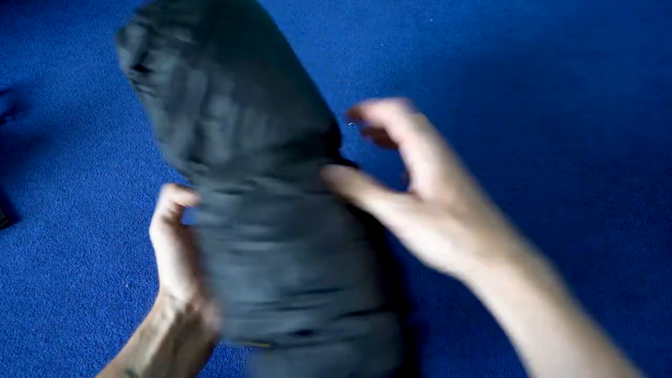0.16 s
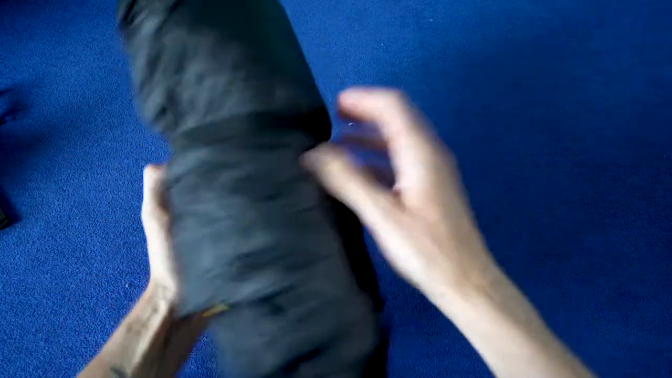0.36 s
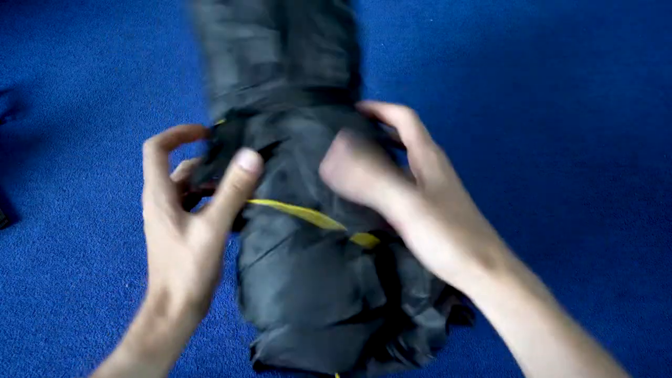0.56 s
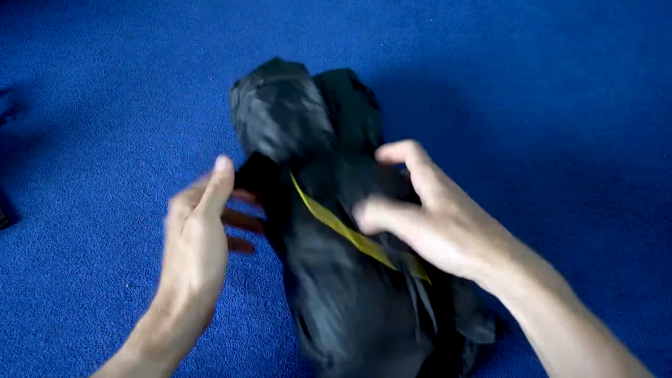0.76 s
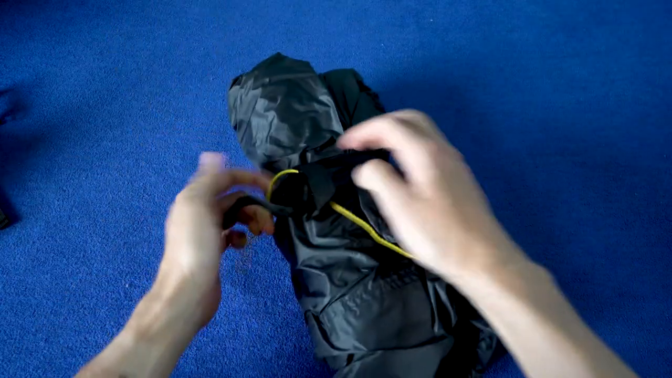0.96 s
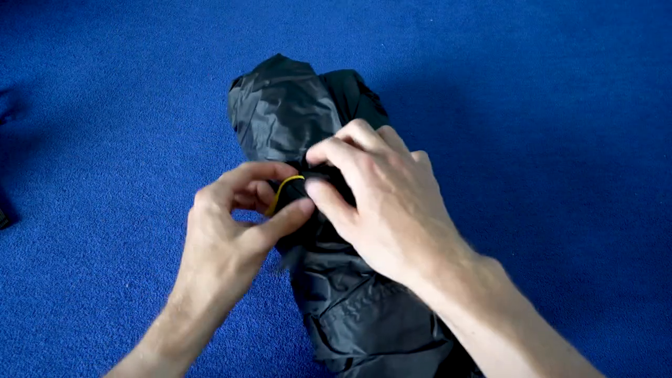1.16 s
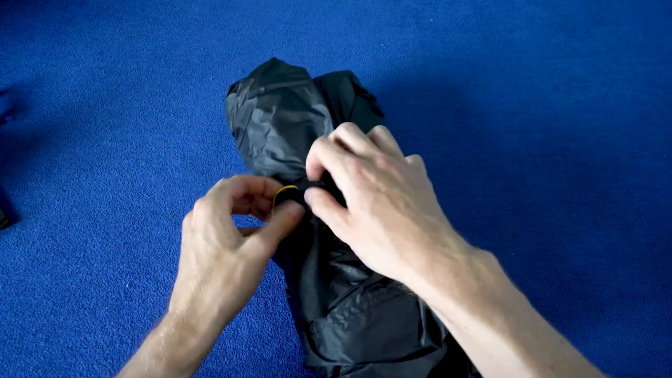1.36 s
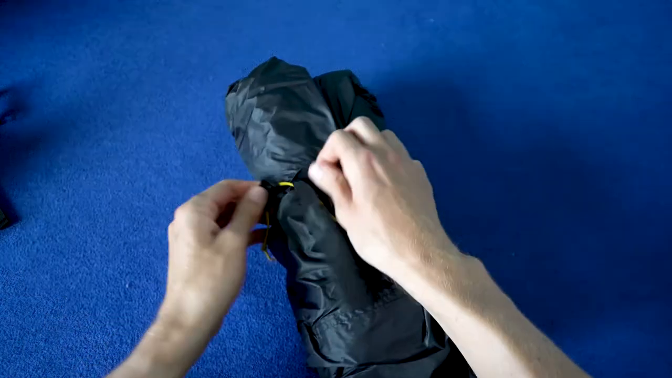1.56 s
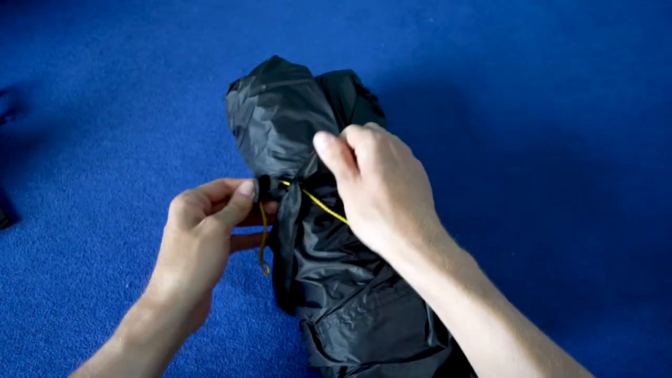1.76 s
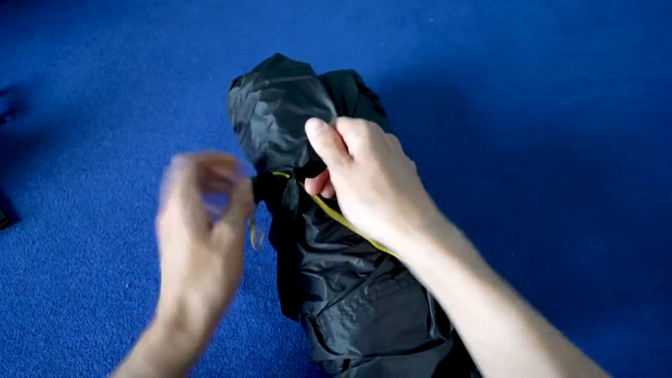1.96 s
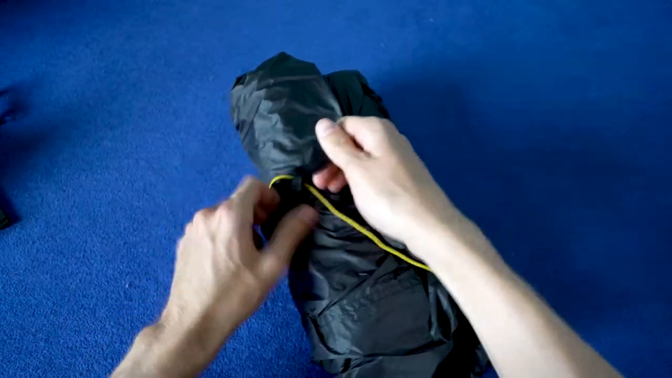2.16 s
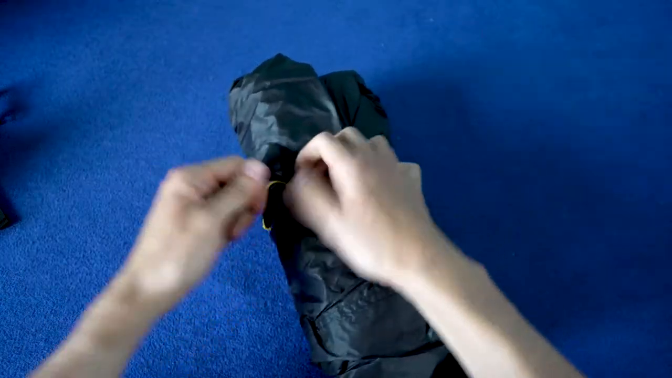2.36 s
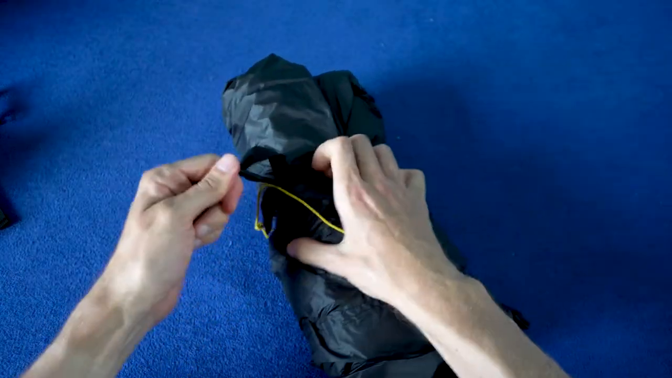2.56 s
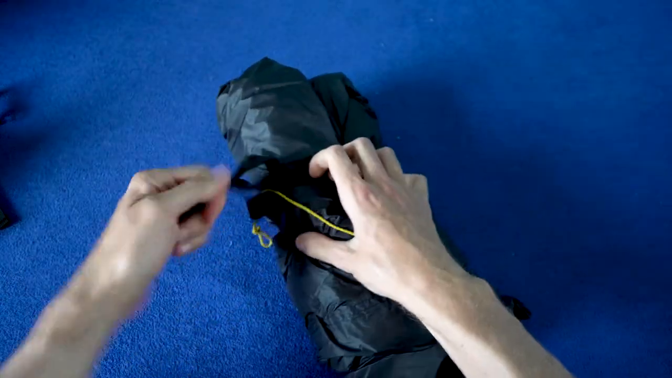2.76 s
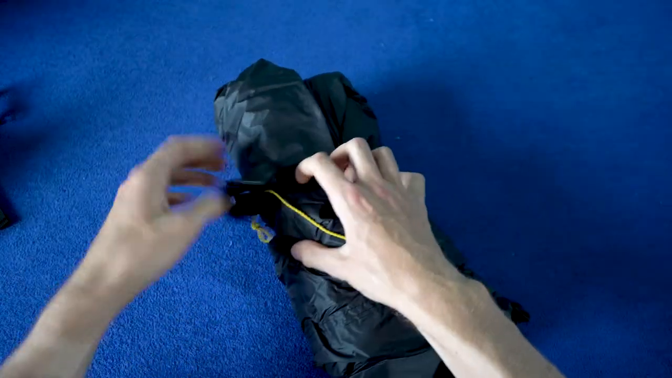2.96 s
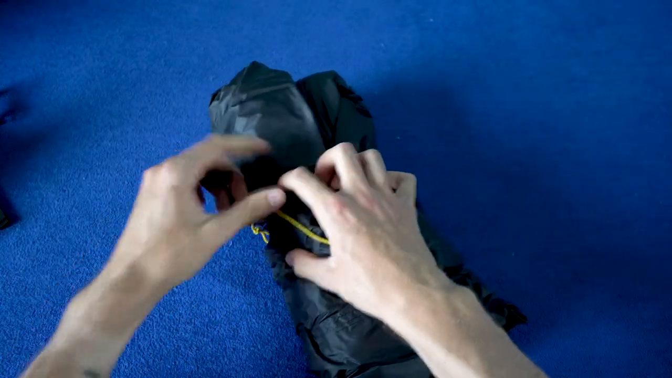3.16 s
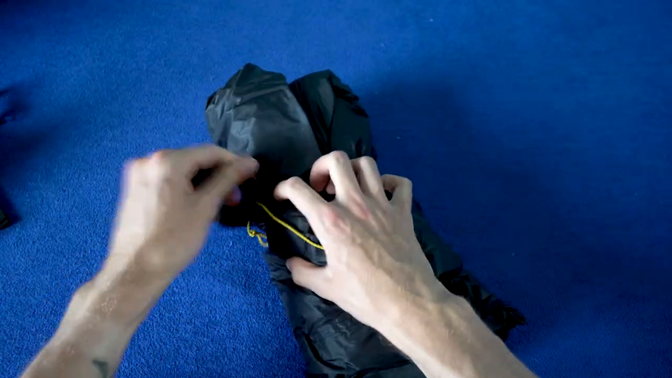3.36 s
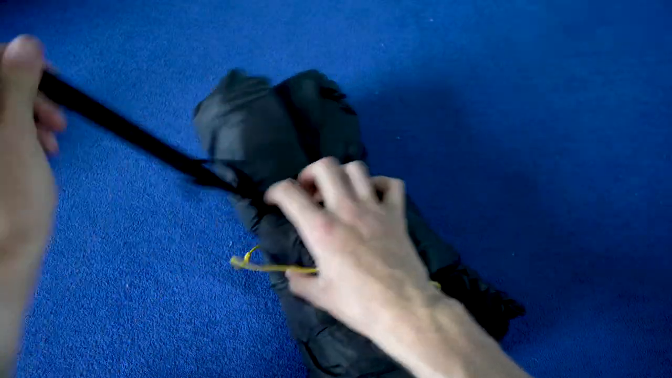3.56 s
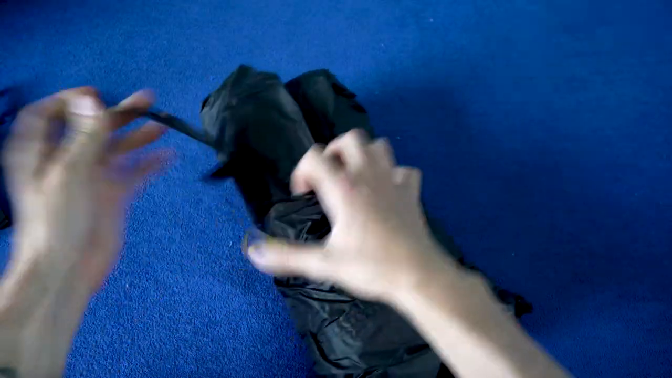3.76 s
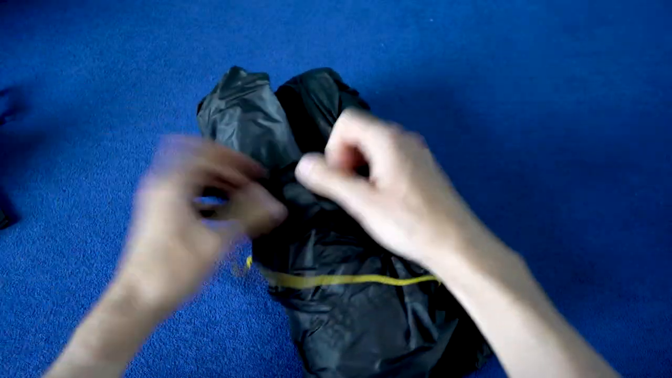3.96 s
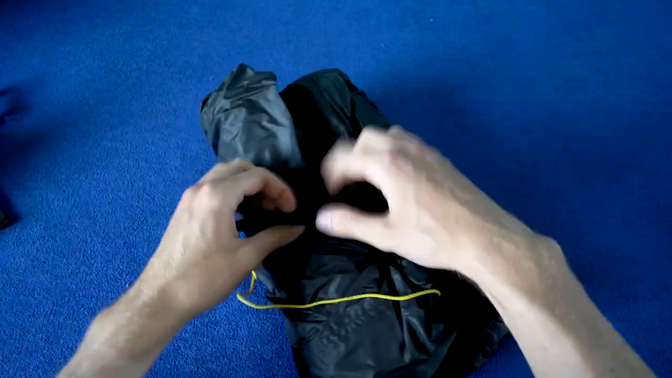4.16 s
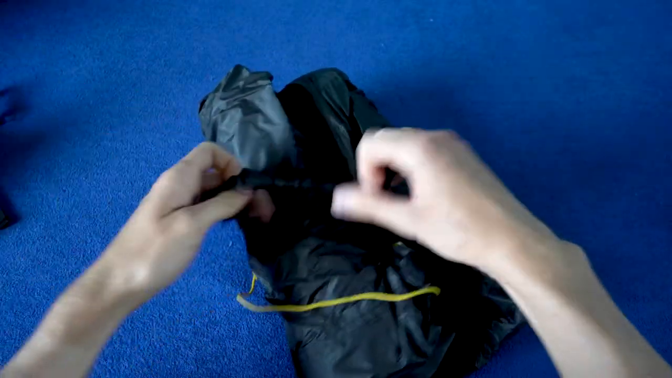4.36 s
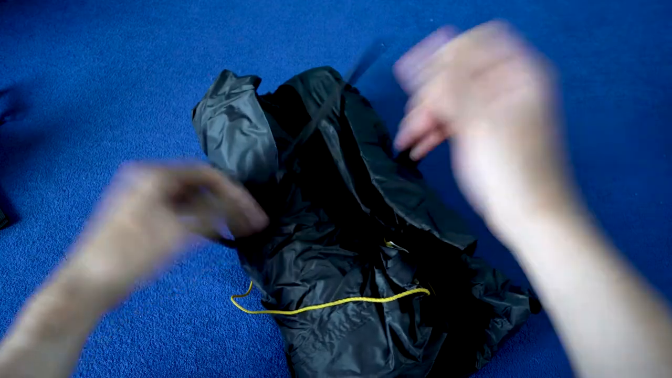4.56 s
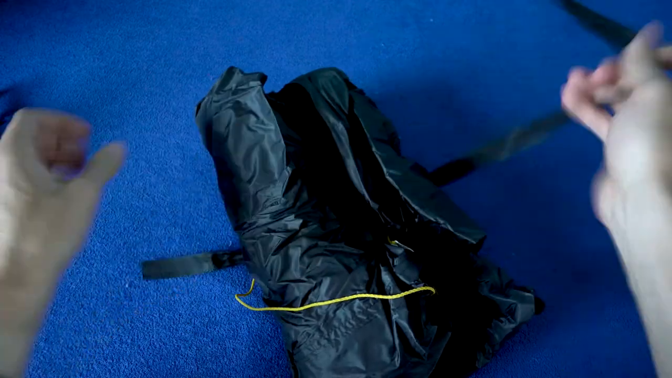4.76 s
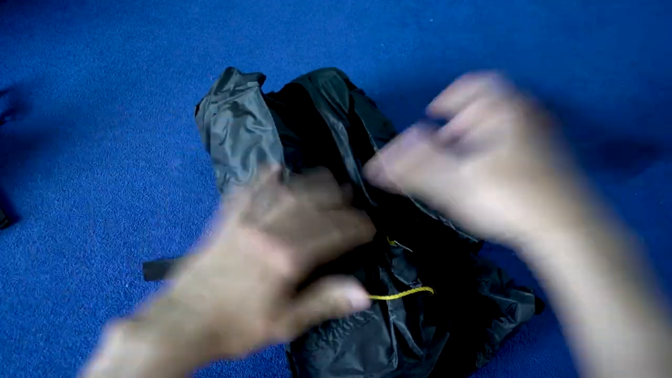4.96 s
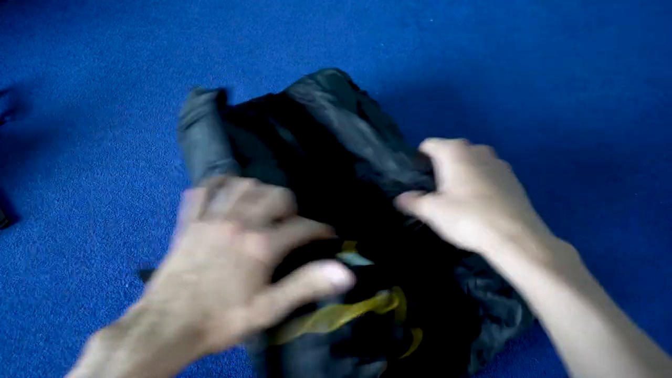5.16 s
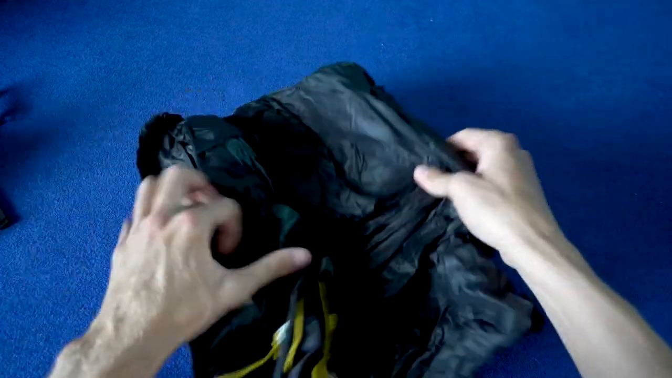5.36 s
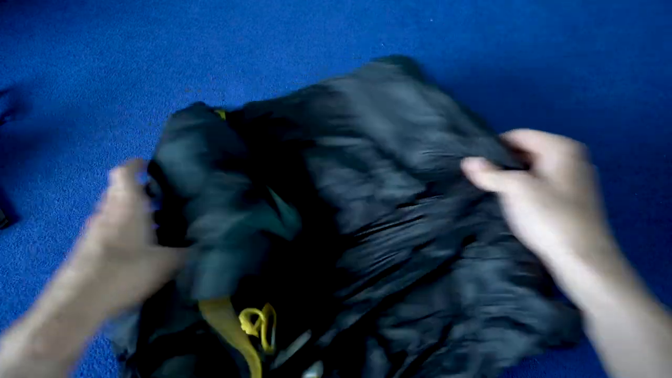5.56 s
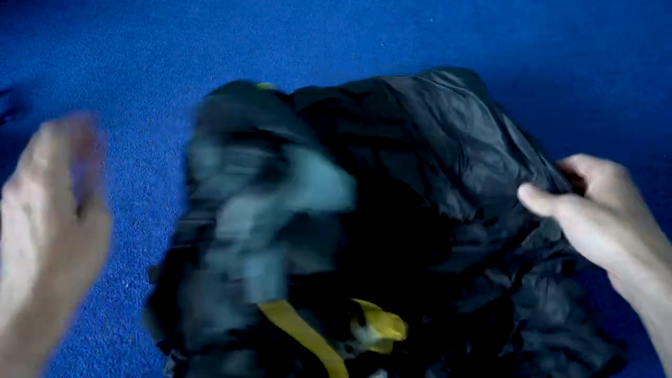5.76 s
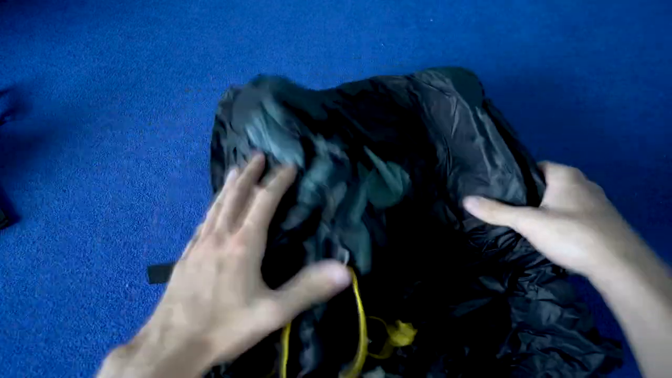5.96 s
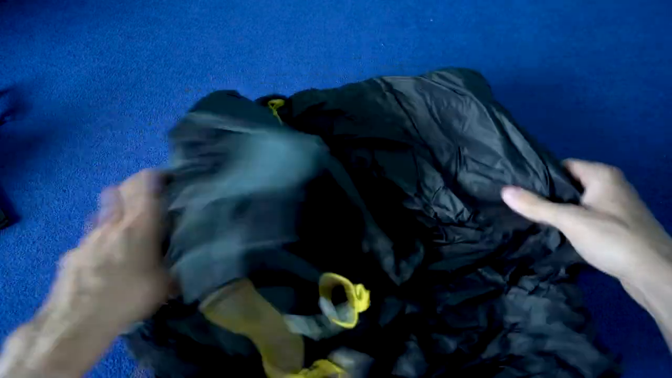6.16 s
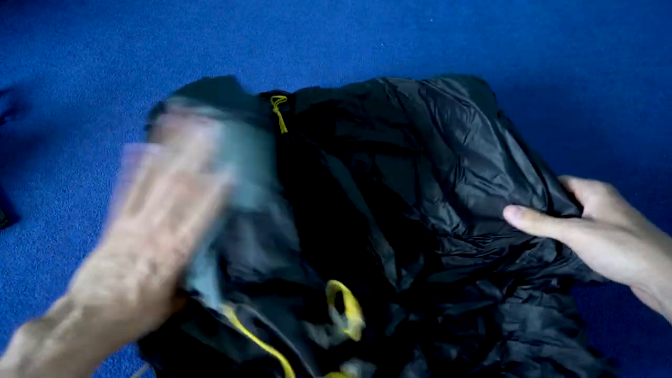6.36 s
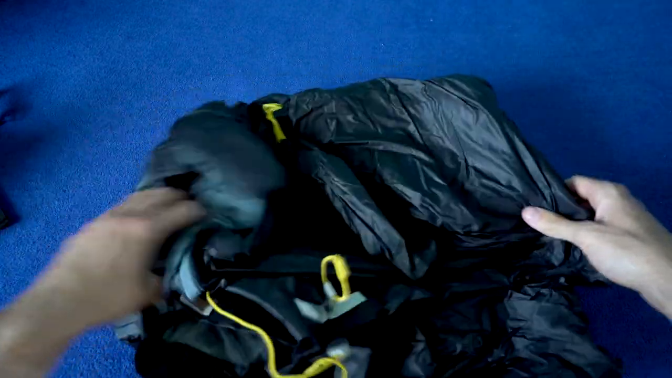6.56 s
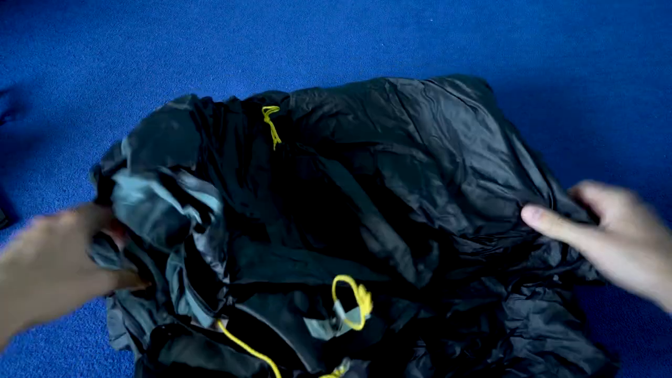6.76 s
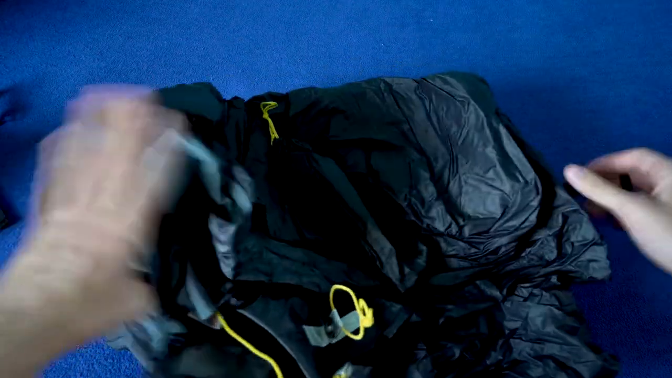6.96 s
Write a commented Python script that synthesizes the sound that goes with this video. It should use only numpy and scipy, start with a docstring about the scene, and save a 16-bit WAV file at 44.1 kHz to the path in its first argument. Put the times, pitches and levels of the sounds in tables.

```python
"""A bundle of thin nylon tent cloth is turned, untied and unrolled on a carpet, close to a stereo microphone.
The cloth is banded noise for the sliding hiss plus clumped clicks, snaps and ticks for buckling creases. A
strap whips out of its knot as gliding narrow-band noise; rubs are noise swells through one resonance. The
bundle thuds in damped low modes, the strap's pops set floor and room ringing, and small metal parts clink in
high ones. Shaped noise makes the faint room tone below; peaks and notches colour the whole."""
import sys
import numpy as np
from scipy import signal
from scipy.io import wavfile

SR = 44100
rng = np.random.default_rng(int(sys.argv[2]) if len(sys.argv) > 2 else 0)


def transcribe(u):
    """Save the signal u as a 16-bit wav file named by the first command-line argument.

    u: samples, shape (n,) or (channels, n), limited to [-1, 1]; the rate is SR.
    q: integer samples, one column per channel.
    """
    v = np.clip(np.atleast_2d(u).T, -1, 1)
    q = np.round(v * 32767).astype(np.int16)
    wavfile.write(sys.argv[1], SR, q)


N = 308700   # samples, 7 s


def from_db(db):
    """Gain of a level in dB."""
    return 10 ** (np.asarray(db) / 20)


def rms_one(x):
    """Scale to rms 1."""
    return x / np.sqrt(np.mean(x ** 2) + 1e-20)


def in_time(rows):
    """Columns of a curve table, one value per sample."""
    s, *columns = np.transpose(rows)
    return [np.interp(np.arange(N) / SR, s, c) for c in columns]


def at_hz(points, hz):
    """Read a spectrum on a log-frequency axis."""
    point_hz, value = np.transpose(points)
    return np.interp(np.log(hz), np.log(point_hz), value)


def drift(rate_hz):
    """Slow chance: coarse noise through a double one-pole low-pass; spread 1."""
    step = 40   # samples per coarse value
    r = np.exp(-2 * np.pi * rate_hz * step / SR)
    coarse = rng.standard_normal(N // step + 2002)
    slow = signal.lfilter([1], [1, -2 * r, r * r], coarse)[2000:]   # drop the filter's start
    return np.interp(np.arange(N) / step, np.arange(len(slow)), rms_one(slow))


def slips(per_s, fade_s, depth):
    """Folds let go suddenly and settle slowly: a power envelope of mean 1."""
    kicks = (rng.random(N) < per_s / SR) * rng.exponential(1, N)
    power = 1 + depth * signal.lfilter([1], [1, -np.exp(-1 / (fade_s * SR))], kicks)
    return power / power.mean()


def ring(clicks, hz, t60_s):
    """Clicks excite a two-pole resonance: each one sets off a decaying sine."""
    r, w = from_db(-60 / (t60_s * SR)), 2 * np.pi * hz / SR
    return signal.lfilter([0, np.sin(w)], [1, -2 * r * np.cos(w), r * r], clicks + 1e-18)


def panned(x, left_db):
    """Place a sound between the two microphones by level."""
    return np.array([x * from_db(left_db / 2), x * from_db(-left_db / 2)])


def apart(click, lag_s):
    """The right microphone hears a click a little earlier or later."""
    i = np.arange(click.shape[1])
    return np.array([click[0], np.interp(i - lag_s * SR, i, click[1])])


def add(out, s, sound):
    """Mix a short sound in at a time."""
    i = round(s * SR)
    out[..., i:i + sound.shape[-1]] += sound[..., :N - i]


# how alike left and right are: pitch_hz, likeness (0 to 1)
LIKENESS = [(50, 0.91), (300, 0.94), (600, 0.81), (1000, 0.85), (2000, 0.82), (4000, 0.53), (15000, 0.72)]


def mid_side(mid, side, hz):
    """Mix shared and opposed noise to the stereo likeness at a pitch."""
    alike = np.clip(at_hz(LIKENESS, hz), 0, 1)
    return np.sqrt(1 + alike) * mid + np.sqrt(1 - alike) * side * [[1], [-1]]


# lean of the microphone pair: pitch_hz, left_over_right_db
LEAN = [(100, 0), (400, 1.4), (1500, -0.5), (4000, 0.3), (8000, 0), (13000, -3)]


def coloured(sources, spectrum, moving_db):
    """Third-octave bands of mid and side excitation, each with its level, its motion and its likeness."""
    out, edges = 0, 22 * 2 ** (np.arange(30) / 3)
    for k, (low, high) in enumerate(zip(edges, edges[1:])):
        band = signal.butter(2, [low, high], "band", fs=SR, output="sos")
        mid, side = signal.sosfilt(band, sources[k % 2])   # neighbouring bands take different sources
        hz = np.sqrt(low * high)
        gain = from_db(at_hz(spectrum, hz) + moving_db(hz))
        lean = from_db(at_hz(LEAN, hz) / 2 * np.array([[1], [-1]]))
        out = out + gain * lean * mid_side(mid, side, hz)
    return out


# spectrum of the room tone: pitch_hz, relative_density_db (per Hz)
ROOM_TONE = [(18, -60), (30, 0), (161, 16.5), (345, 8), (394, -1), (569, -48), (684, -27), (740, -51),
             (1720, 2.5), (16000, -31)]
ROOM_TONE_DB = -68   # rms before the room colour


def room_tone():
    """The steady faint noise of room and microphone: shaped noise at one level."""
    noise = rng.standard_normal((2, 2, N))
    return from_db(ROOM_TONE_DB) * rms_one(coloured(noise, ROOM_TONE, lambda hz: 0))


# touches of small metal parts: start_s, touch_db (relative), part (0 the first part, 1 the second)
CLINKS = [(5.8606, -21, 0), (5.8634, -32, 0), (5.869, -29, 0), (5.878, -33, 1), (5.885, -37, 1),
          (5.890, -37, 1), (5.8957, -33, 1), (5.899, -28, 1), (5.9025, -39, 1), (5.905, -29, 1),
          (5.915, -34, 1), (5.919, -44, 1), (5.925, -41, 1)]
# modes of the metal: pitch_hz, first_db (relative, first part), second_db (relative, second part), t60_s
METAL = [(3760, -4, -8, 0.024), (4030, -11, -9, 0.023), (4210, -16, -8, 0.025), (4360, -14, -2.5, .03),
         (4580, -13, -16, .02), (7280, -1, -5, 0.027), (8000, -7, 0.5, 0.038), (8220, -4.5, -5.5, 0.027),
         (12370, -6, -11, 0.023), (12330, -3, -9, 0.02), (12700, 0, -13, 0.029), (13050, -12, -12, .025)]


def clinks(crack_db, rattle_s):
    """Each touch is a bare click plus a short uneven chatter striking every metal mode by its own strength."""
    s, touch_db, part = np.transpose(CLINKS)
    at, out = np.round(s * SR).astype(int), np.zeros(N)
    out[at] = from_db(touch_db + crack_db)
    chance_db = rng.normal(0, 2.3, (len(CLINKS), len(METAL)))
    for k, (hz, first_db, second_db, t60_s) in enumerate(METAL):
        mode_db = np.where(part > .5, second_db, first_db)
        clicks = np.zeros(N)
        clicks[at] = from_db(touch_db + mode_db + chance_db[:, k])
        fading = signal.lfilter([1], [1, -np.exp(-1 / (rattle_s * SR))], clicks)
        chatter = fading * rng.standard_normal(N)
        out += ring(chatter / np.sqrt(rattle_s * SR / 2), hz, t60_s)   # same energy at any rattle length
    return out


# soft bumps of knuckles, knot and bundle: start_s, level_db (nominal), pitch_hz
THUDS = [(.64, -43, 230), (0.773, -42, 154), (.775, -51, 80), (.80, -55, 29.8), (.83, -47, 110),
         (.85, -40.5, 287), (.875, -52, 60), (1.022, -40.5, 310), (1.107, -41, 315), (1.418, -40, 199),
         (1.4745, -34, 282), (1.869, -44, 253), (2.185, -49, 200), (2.371, -43, 242), (2.489, -53, 103),
         (2.656, -38, 258), (2.659, -50.5, 101), (3.415, -41, 220), (3.493, -28, 288), (3.512, -24.5, 198),
         (3.541, -30, 117), (3.60, -50, 100), (3.776, -37, 262), (5.026, -54, 119), (5.338, -25.5, 316),
         (5.3393, -22, 560)]
# the knot pops free: start_s, level_db (nominal)
POPS = [(3.547, -26), (3.572, -36)]
# modes of floor and room struck by each pop: pitch_hz, level_db (relative to the pop), t60_s
SLAP_MODES = [(193, -10, 0.11), (337, -7, 0.16), (560, -6.5, 0.057), (766, -2, .05)]
THUD_CYCLES = 7.2   # cycles to fall 60 dB


def thuds():
    """Soft contacts and pops: a push and release lasting one cycle rings a damped low mode."""
    blows = [(s, db, hz, THUD_CYCLES / hz) for s, db, hz in THUDS]
    blows += [(s, db + mode_db, hz, t60_s) for s, db in POPS for hz, mode_db, t60_s in SLAP_MODES]
    out = np.zeros(N)
    for s, level_db, hz, t60_s in blows:
        push = np.zeros(round(t60_s * SR * 1.5 + SR / hz))
        soft = np.diff(np.hanning(round(SR / hz)))
        push[:len(soft)] = -soft
        no_rumble = signal.butter(2, hz * 0.69, "high", fs=SR)
        add(out, s, from_db(level_db) * signal.lfilter(*no_rumble, ring(push, hz, t60_s)))
    return out


# the strap drags through its knot, singing higher as it speeds up: time_s, level_db, pitch_hz
STRAP = [(3.41, -75, 841), (3.43, -42, 918), (3.445, -34, 993), (3.46, -45, 1225), (3.48, -35, 1640),
         (3.5, -54, 1830), (3.517, -36, 1936), (3.54, -70, 2060)]
STRAP_WIDTH_HZ = 530   # bandwidth of each of the two smoothing poles


def strap():
    """Friction noise in a narrow band that glides: slow noise carried on the moving centre."""
    level_db, hz = in_time(STRAP)
    r = np.exp(-np.pi * STRAP_WIDTH_HZ / SR)
    slow = signal.lfilter([1], [1, -2 * r, r * r], rng.standard_normal((2, N)))
    turn = 2 * np.pi * np.cumsum(hz) / SR
    return from_db(level_db) * rms_one(slow[0] * np.cos(turn) + slow[1] * np.sin(turn))


# rubs and swishes of fingers and taut cloth: centre_s, level_db (nominal), pitch_hz, length_s, sharpness (Q)
RUBS = [(0.046, -44, 1780, 0.03, 9.3), (0.146, -44, 1730, 0.022, 6), (0.167, -37.5, 8000, 0.033, 0.95),
        (.378, -44.5, 6000, 0.0049, .8), (0.395, -49, 2000, .012, 1.4), (0.619, -42, 6550, 0.042, 9),
        (.946, -43.5, 1910, 0.017, 8.3), (1.018, -48, 3640, 0.02, 5.7), (1.227, -47.5, 1620, 0.022, 5.3),
        (1.424, -39, 5500, 0.017, 3.6), (2.297, -46, 6800, .015, 9), (2.341, -40, 2580, 0.012, 3.6),
        (2.493, -43.5, 1120, 0.029, 5), (2.895, -50, 9000, .01, .8), (2.924, -50, 7000, 0.039, 1.8),
        (2.988, -52.5, 10000, 0.0093, 1), (3.263, -55, 9000, 0.013, .8), (3.518, -32.5, 1900, 0.0063, 5.1),
        (4.186, -41, 3050, 0.02, 8), (4.299, -40, 3450, 0.018, 4.1), (4.57, -44, 2260, .02, 11),
        (6.11, -38, 1930, 0.016, 4.3), (6.213, -35, 1010, 0.012, 6.4), (6.67, -43, 6200, 0.018, 10)]


def rubs():
    """A brief swell of friction noise through one resonance, broad for a swish."""
    out = np.zeros((2, N))
    noise = rng.standard_normal((len(RUBS), 2, 3000))
    for (s, level_db, hz, length_s, sharpness), burst in zip(RUBS, noise):
        resonance = signal.iirpeak(hz, max(sharpness, .6), fs=SR)
        mid, side = rms_one(signal.lfilter(*resonance, burst))
        tone = mid_side(mid, side, hz)
        swell = np.hanning(round(length_s * SR))
        add(out, s - length_s / 2, from_db(level_db) * swell * tone[:, -len(swell):])
    return out


# single creases that snap: start_s, peak_db (before trim), lowest_hz, highest_hz
SNAPS = [(0.0867, -22, 900, 5100), (0.143, -21, 1300, 14400), (0.2543, -20, 1800, 7200),
         (0.3097, -28, 900, 5100), (0.3914, -27, 1300, 3600), (0.4817, -26, 3600, 14400),
         (0.4873, -27, 2500, 14400), (0.6769, -25, 1300, 10200), (0.9087, -28, 1800, 14400),
         (0.9445, -28, 1800, 3600), (1.1267, -26, 2500, 14400), (1.2342, -18, 5100, 14400),
         (1.2583, -27, 900, 10200), (1.3365, -27, 7200, 14400), (1.3543, -24, 1800, 14400),
         (1.3811, -18, 900, 14400), (1.4191, -21, 3600, 10200), (1.4231, -26, 900, 10200),
         (1.4932, -29, 1800, 14400), (1.5824, -33, 900, 3600), (1.9316, -32, 10200, 14400),
         (2.1895, -19, 2500, 14400), (2.2428, -31, 1800, 5100), (2.3412, -16, 1800, 10200),
         (2.4875, -18, 3600, 14400), (2.5393, -19, 1300, 10200), (2.5707, -25, 2500, 10200),
         (2.6857, -32, 1300, 7200), (2.8246, -33, 900, 7200), (2.8518, -23, 1800, 7200),
         (3.0063, -34, 1300, 3600), (3.0374, -28, 5100, 14400), (3.0522, -31, 1300, 7200),
         (3.0557, -36, 1300, 14400), (3.0892, -41, 1800, 3600), (3.2886, -33, 1800, 10200),
         (3.3801, -36, 900, 10200), (3.4939, -20, 1300, 14400), (3.5117, -20, 1300, 14400),
         (3.739, -30, 1300, 7200), (3.7651, -27, 1800, 7200), (3.7948, -22, 900, 14400),
         (3.8406, -20, 3600, 14400), (4.1315, -27, 1300, 7200), (4.1398, -27, 1800, 7200),
         (4.151, -25, 900, 10200), (4.2984, -22, 900, 5100), (4.3682, -22, 1300, 14400),
         (4.4811, -32, 900, 7200), (4.5368, -16, 1800, 7200), (4.5584, -20, 1800, 14400),
         (4.9624, -43, 3600, 7200), (5.0264, -31, 900, 14400), (5.0634, -19, 900, 14400),
         (5.1338, -21, 3600, 10200), (5.1651, -16, 3600, 10200), (5.4334, -17, 1800, 10200),
         (5.4834, -10, 1300, 14400), (5.5385, -16, 1800, 10200), (6.1146, -21, 1300, 3600),
         (6.1319, -14, 1300, 14400)]


def snaps(tail_db, tail_t60_s, trim_db, lag_s, scatter_db):
    """A crease flips: one sharp click within its band, then a faint after-crackle."""
    out, t = np.zeros((2, N)), np.arange(1500) / SR
    noise = rng.standard_normal((len(SNAPS), 2, len(t)))
    places = rng.standard_normal((len(SNAPS), 2)) * [lag_s, scatter_db]
    for (s, peak_db, low_hz, high_hz), burst, (lag, left_db) in zip(SNAPS, noise, places):
        puff = from_db(tail_db - 60 * t / tail_t60_s) * burst
        puff[:, :9] = -np.eye(9)[8]   # eight silent samples, then the click
        band = signal.butter(2, [low_hz, min(high_hz, 17000)], "band", fs=SR, output="sos")
        click = signal.sosfilt(band, puff)
        click = apart(click / np.abs(click).max(), lag) * from_db([[left_db / 2], [-left_db / 2]])
        add(out, s - 8 / SR, from_db(peak_db + trim_db) * click)
    return out


# each pull, turn or squeeze: peak_s, level_db (before trims), swell_ms (per 10 dB, at least 5),
# fade_ms (per 10 dB, at least 5), sheen_db (treble control), fullness_db (control around 900 Hz)
STROKES = [(0.042, -42, 79, 63, -2, 0), (0.157, -40.0, 83, 48, 1.5, -1.5), (0.266, -47.0, 86, 76, -5, 2),
           (0.388, -49.5, 34, 112, -3, 3.5), (0.487, -46.5, 6, 230, 2.5, -2),
           (0.621, -41.0, 56, 113, -1, -1.5), (0.785, -42.5, 33, 137, -2.5, -0.5),
           (0.946, -49, 18, 29, 2, -10), (1.023, -46, 30, 12, 1, -10), (1.105, -46.5, 53, 112, 2, -6.5),
           (1.232, -45.5, 29, 30, 3, 1), (1.426, -43, 20, 33, 5, -8), (1.518, -47.0, 312, 141, -1, -6),
           (1.734, -51.5, 66, 22, 3.5, -8), (1.872, -49.5, 88, 31, 0.5, -10),
           (1.973, -48.5, 57, 41, 3.5, -9), (2.192, -45, 12.5, 189, 1, -6), (2.34, -44.5, 41, 23, -6, -7),
           (2.393, -48.5, 42, 59, 5, -8), (2.482, -41, 11, 39, -2.5, -3), (2.565, -47.5, 61, 77, -1, -5),
           (2.662, -46.5, 47, 59, -7, -2), (2.805, -51.5, 78, 175, -3, -2), (2.931, -53, 46, 22, 7, -5),
           (3.045, -66, 6, 52, 8, -13), (3.293, -60, 122, 11, 1, -12), (3.44, -43, 12, 90, -1.5, 3),
           (3.488, -37.5, 53, 13, 2.5, 9), (3.514, -34.5, 9, 40, 2, 6), (3.663, -54, 47, 78, -7, -2),
           (3.824, -40, 61, 59, 2.5, -3.5), (3.945, -46.5, 123, 45, 3.5, -10),
           (4.069, -44.5, 95, 23, 0.5, -4.5), (4.209, -39.5, 57, 17, -1, -6.5),
           (4.296, -40.5, 40, 73, -0.5, -7), (4.441, -46, 55, 40, 2.5, -3),
           (4.539, -40.0, 38, 60, -2, -6.5), (4.754, -57.5, 400, 90, 4.5, 2),
           (5.023, -47, 0, 392.5, -2.5, 1.5), (5.115, -44.5, 26, 400, 3.5, -7),
           (5.312, -38.5, 113, 174, 2, 5), (5.438, -36.5, 16, 278, 1, -4.5), (5.623, -36, 118, 99, -4, 2.5),
           (5.91, -36, 75, 36, 0, 1), (5.972, -38.0, 36, 308, -1.5, -3), (6.125, -35.5, 40, 38, -3, -6),
           (6.203, -33, 107, 52, -4, 3.5), (6.462, -45, 6, 400, 0, 0), (6.655, -31.5, 185, 99, -3.5, 2),
           (6.882, -41.5, 229, 138, -1, -2)]
# slow colour of the rustle: time_s, weight_db (bass control), left_db (left over right, before scaling by pitch)
LOWS = [(0.0, -3.0, -1.5), (0.45, -2.5, 4.5), (0.8, -1, 0.0), (1.0, -11, 2), (1.3, -9, 1), (1.6, -1.5, 0.5),
        (2.0, -13, 1), (2.3, -4.5, 1.5), (2.65, -1, 0.5), (3.1, -10.5, 3), (3.4, -9, 1.5), (3.57, 9.5, 1.5),
        (3.75, 2, 1.5), (4.2, -8, 1), (4.5, -5.0, 2), (4.8, 7, 6), (5.05, -1, 0), (5.6, 0, 1),
        (6.0, -3, -0.5), (6.6, -3, 2.5), (7.0, -1.5, 3)]
STROKE_ROUNDING, AT_REST_DB = 0.23, -66.5   # softness of the top; the cloth settling on its own, before trims
# share of each swing about the mean level taken off the bass and middle controls
BASS_LAGS, MIDDLE_LAGS, MEAN_DB = 0.4, 0.24, -43.5
TREBLE_LEADS = 0.23   # share of each swing added to the sheen: tails are duller than peaks


def handling():
    """Strokes swell and fade at steady rates in dB and add up as power; the lows swing less than the rustle."""
    t = np.arange(0, N + 32, 32) / SR
    power, colour = from_db(2 * AT_REST_DB), 0
    for s, level_db, swell_ms, fade_ms, *colour_db in STROKES:
        away = 1000 * (t - s) / np.maximum(np.where(t < s, swell_ms, fade_ms), 5)
        fall_db = 10 * (np.hypot(away, STROKE_ROUNDING) - STROKE_ROUNDING)
        stroke = from_db(2 * (level_db - fall_db))   # doubled dB gives power
        power = power + stroke
        colour = colour + np.outer(colour_db, stroke)   # louder strokes weigh more in the colour
    level_db, sheen_db, full_db = in_time(np.transpose([t, 10 * np.log10(power), *colour / power]))
    weight_db, left_db = in_time(LOWS)
    swing_db = level_db - MEAN_DB
    sheen_db = sheen_db + TREBLE_LEADS * swing_db
    full_db = full_db - MIDDLE_LAGS * swing_db
    weight_db = weight_db - BASS_LAGS * swing_db
    return level_db, sheen_db, full_db, weight_db, left_db


def ticks(per_s, spread_db, over_db, cycles, tilt_db, scatter_db):
    """Small creases flip at random, as loud as the handling; each rings briefly at a pitch dealt by chance."""
    sizes = from_db(handling()[0] + over_db + spread_db * np.minimum(rng.exponential(1, N), 3.4))
    born = rng.random(N) < per_s * from_db(4 * drift(15)) / SR
    clicks = born * sizes * rng.choice([-1, 1], N)
    clicks = panned(clicks, rng.normal(0, scatter_db, N))
    dealt, out = rng.integers(0, 12, N), 0
    for k, hz in enumerate(np.geomspace(1100, 12000, num=12)):
        place = rng.integers(-3, 4)   # samples by which the right side lags
        rung = from_db(tilt_db * np.log2(hz / 3000)) * ring(clicks * (dealt == k), hz, cycles / hz)
        out = out + np.array([rung[0], np.roll(rung[1], place)])
    return signal.sosfilt(signal.butter(2, 700, "high", fs=SR, output="sos"), out)   # a crease moves no bass


# spectrum of the cloth: pitch_hz, relative_density_db (per Hz)
CLOTH = [(25, -24), (60, -15.5), (150, -8.5), (300, -3.5), (700, -6.5), (1000, -4.5), (2000, -6),
         (4000, -8.5), (8000, -10.5), (12000, -11.5), (16000, -18.5)]


def rustle(creases_per_s, spread_db, crackle_share, clump_db, patchy_db, trim_db):
    """Sliding hiss plus tiny creases that buckle in clumps, coloured by the cloth."""
    level_db, sheen_db, full_db, weight_db, left_db = handling()
    clumps = from_db(clump_db * drift(40)) * slips(per_s=90, fade_s=0.0034, depth=.6)
    born = rng.random(N) < creases_per_s * clumps / SR
    sizes = born * from_db(spread_db * np.minimum(rng.exponential(1, N), 6))
    creases = rms_one(sizes * rng.choice([-1, 1], N))
    creases = np.array([creases, creases * rng.standard_normal(N)])   # each crease sits somewhere else
    share = np.clip(crackle_share, 0, 1)
    hiss = np.sqrt(clumps) * rng.standard_normal((2, 2, N))
    crackle = creases * [[[1]], [[-1]]]   # flipped in every other band
    sources = np.sqrt(1 - share) * hiss + np.sqrt(share) * crackle

    def moving_db(hz):
        """The three tone controls blend over frequency; every band also flickers on its own."""
        def blend(*weights):
            return at_hz(list(zip((250, 900, 2000, 4500, 9000), weights)), hz)
        tone_db = blend(0.92, 0, 0, 0, 0) * weight_db
        tone_db = tone_db + blend(0, 0.77, 0, 0, 0) * full_db
        tone_db = tone_db + blend(0, 0, 0, 0, 1) * sheen_db
        side_db = np.clip(hz / 900, .1, 1) * left_db / 2 * [[1], [-1]]   # bass leans least to one side
        return level_db + trim_db + tone_db + side_db + patchy_db * drift(17.4)
    return coloured(sources, CLOTH, moving_db)


# standing waves and floor echo lift some pitches and cancel others: pitch_hz, width_hz, level_db
ROOM_COLOUR = [(116, 9, 2), (134, 21, -2.5), (176, 23.6, -9), (212, 82, 3.5), (331, 6.9, 3.5),
               (405, 28, -0.5), (639, 12, -4), (725, 49, -7), (927, 8.6, 3), (1020, 59, 2), (1152, 30, -2),
               (1211, 74, 4.5), (1264, 290, -3), (1794, 110, 1.5)]


def room(x):
    """Standing waves and the floor echo as a chain of peaks and notches."""
    for hz, width_hz, level_db in ROOM_COLOUR:
        w, a, g = 2 * np.pi * hz / SR, np.pi * width_hz / SR, from_db(level_db / 2)
        x = signal.lfilter([1 + a * g, -2 * np.cos(w), 1 - a * g], [1 + a / g, -2 * np.cos(w), 1 - a / g], x)
    return x


def scene():
    """All sources together, heard in the room."""
    cloth = rustle(creases_per_s=2500, spread_db=1.5, crackle_share=0.21, clump_db=1.17,
                   patchy_db=1.4, trim_db=10.5)
    creases = snaps(tail_db=-21.0, tail_t60_s=0.012, trim_db=1.5, lag_s=1.5e-5, scatter_db=0.0)
    creases = creases + ticks(per_s=500, spread_db=4.0, over_db=5.5, cycles=3.34, tilt_db=2.5, scatter_db=4)
    swishes = rubs()
    bumps = panned(thuds(), 0.59)
    whip = panned(strap(), 5.1)
    metal = panned(clinks(crack_db=-3, rattle_s=0.0013), -5.5)
    return room(cloth + creases + swishes + bumps + whip + metal + room_tone())


CUTOFF_HZ = 15850


def record(dry):
    """A steep low-pass cuts the top."""
    return signal.sosfilt(signal.ellip(12, .3, 70, CUTOFF_HZ, fs=SR, output="sos"), dry)


dry = scene()
out = record(dry)
transcribe(out)
```